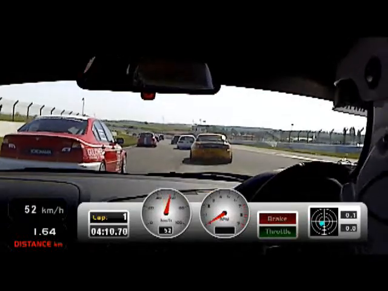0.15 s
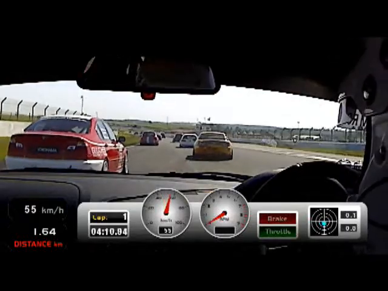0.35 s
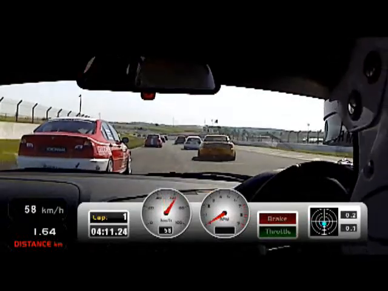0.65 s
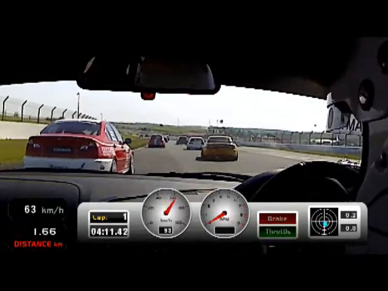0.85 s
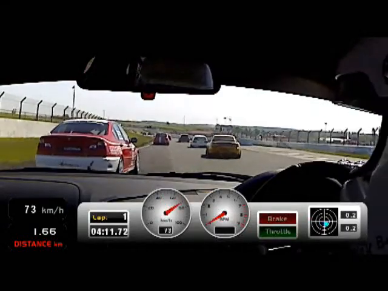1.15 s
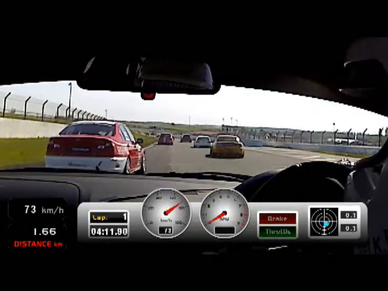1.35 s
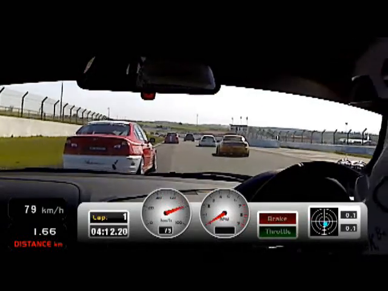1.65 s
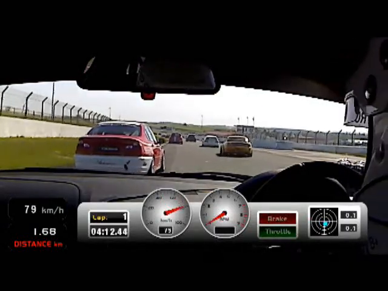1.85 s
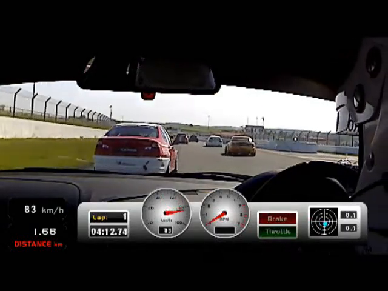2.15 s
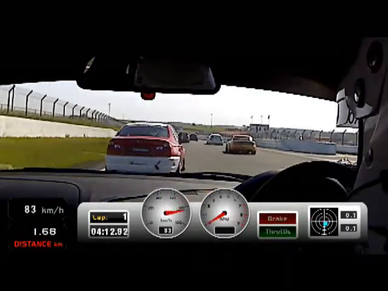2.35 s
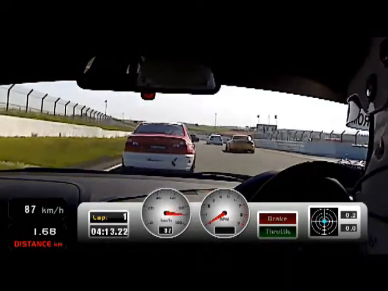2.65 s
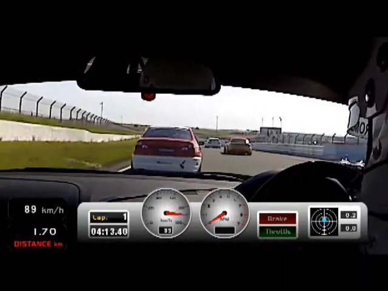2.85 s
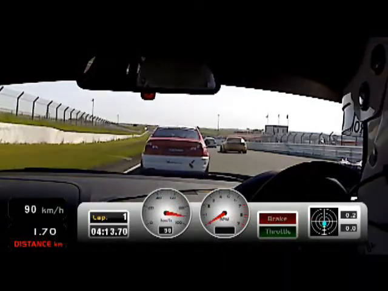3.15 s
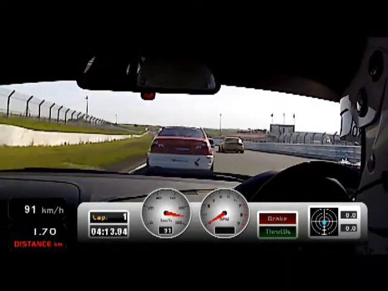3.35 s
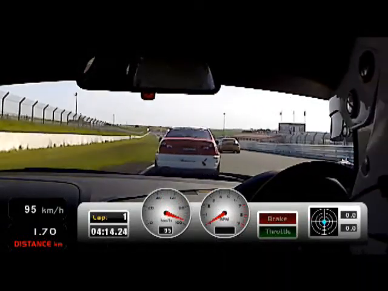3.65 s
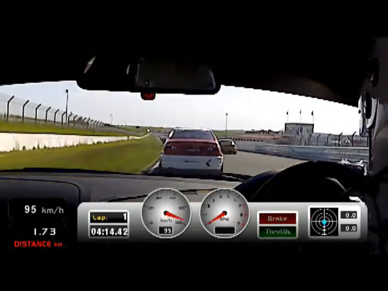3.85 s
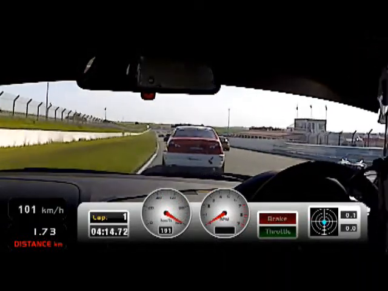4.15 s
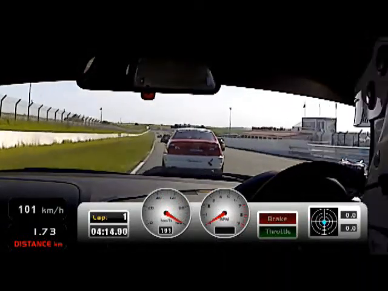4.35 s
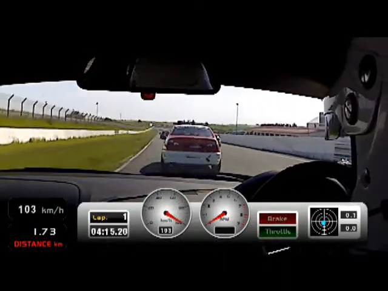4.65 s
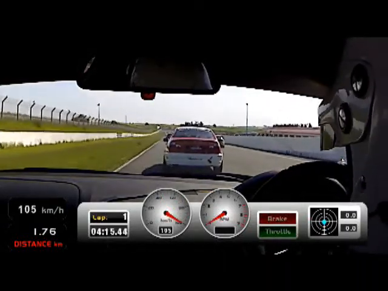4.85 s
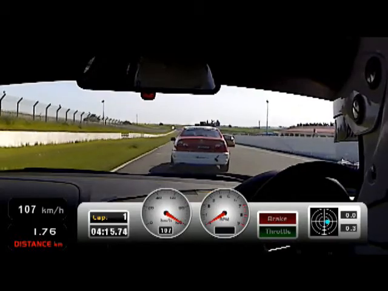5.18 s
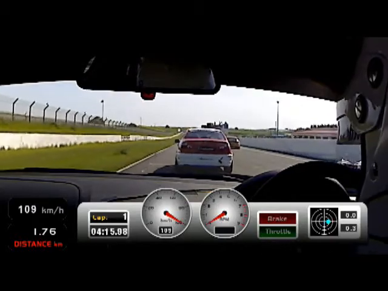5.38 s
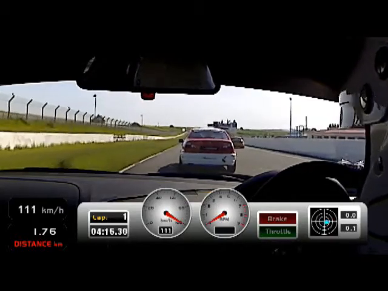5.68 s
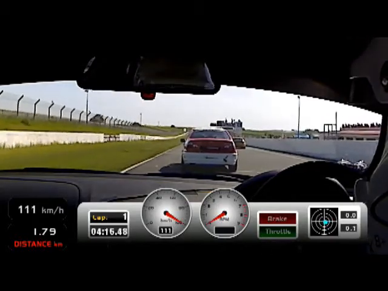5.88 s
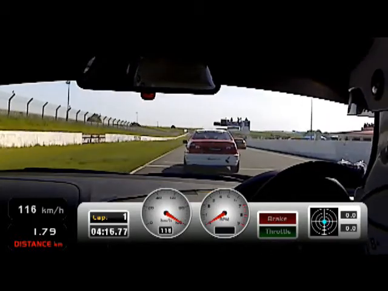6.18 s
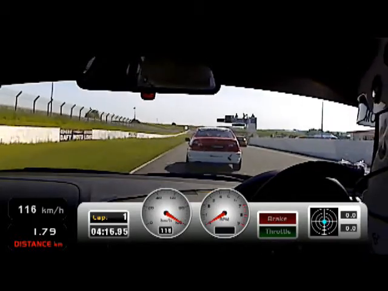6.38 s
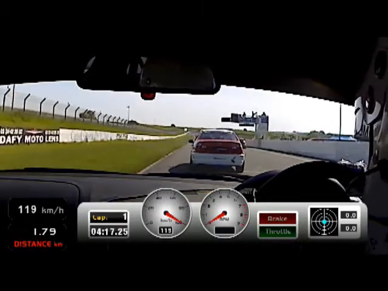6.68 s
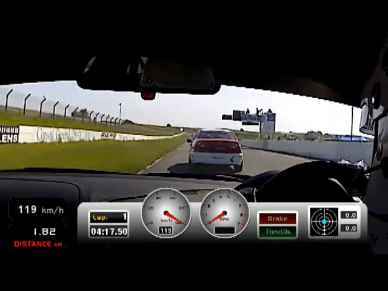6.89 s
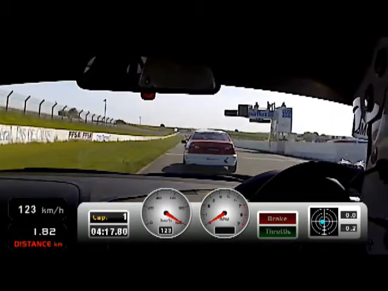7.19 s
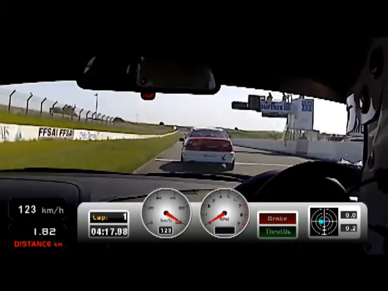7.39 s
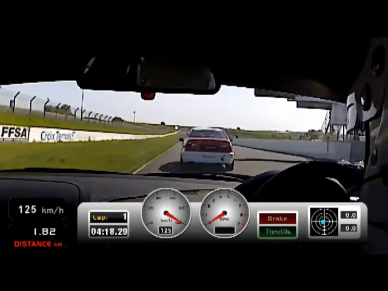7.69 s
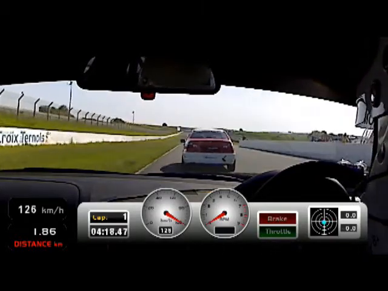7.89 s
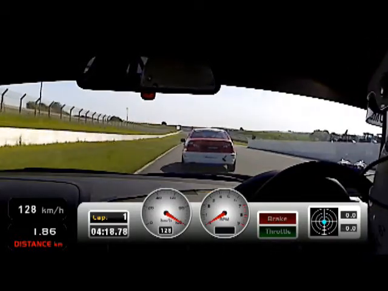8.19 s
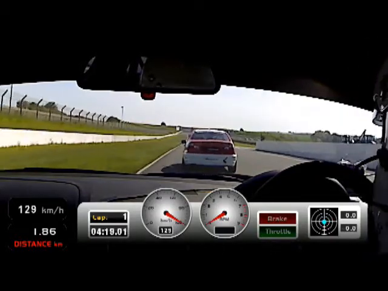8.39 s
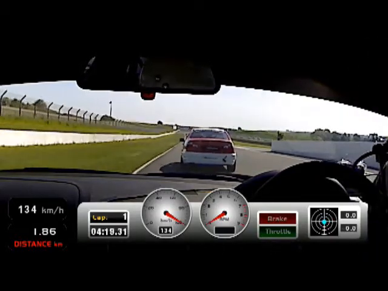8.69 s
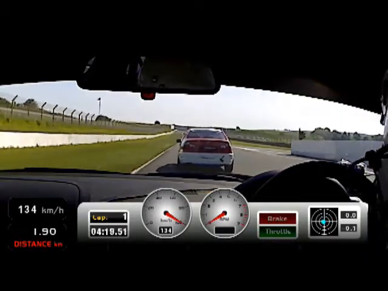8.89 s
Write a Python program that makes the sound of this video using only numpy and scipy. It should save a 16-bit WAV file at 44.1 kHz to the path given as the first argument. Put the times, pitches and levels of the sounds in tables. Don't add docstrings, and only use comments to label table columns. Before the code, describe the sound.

A small, dull microphone in a hollow metal cabin catches a loud engine accelerating on a track. A neighbouring car's note fades almost at once. The engine rises, lifts for one shift, lands lower with a floor boom and drones upward again. Light metallic ticking runs throughout, with clusters of hard knocks around the middle and again, much louder, towards the end, over growing wind and road noise.

```python
import sys
import numpy as np
from scipy import signal
from scipy.fft import rfft, irfft, next_fast_len
from scipy.io import wavfile
from scipy.ndimage import uniform_filter1d

SR = 44100
rng = np.random.default_rng(int(sys.argv[2]) if len(sys.argv) > 2 else 0)


def materialize(psi):
    bounded = np.clip(np.atleast_2d(psi).T, -1, 1)
    quanta = np.round(bounded * 32767).astype(np.int16)
    wavfile.write(sys.argv[1], SR, quanta)


def invert_db(x):
    u = np.asarray(x, float) / 20
    return 10 ** u


N = 398223

# time in seconds, four-stroke cycles per second.
ENGINE_SPEED = [(0, 37.5), (.5, 40.55), (1, 44.25), (1.5, 47.8), (2, 51), (2.45, 53.85), (2.6, 52),
                (2.9, 38.5), (2.97, 37.2), (4, 39.75), (5, 42.8), (6, 45.7), (7, 48.7), (8, 51.35),
                (9.03, 54.25)]
# time in seconds, level in dB.
THROTTLE = [(0, -4.5), (1, 2), (2.42, 2), (2.5, -22), (2.86, -4), (2.98, -1), (6, 0), (7.5, 1.5),
            (9.03, -2)]
ORDER_DB = [-0.5, 6.5, 6, 10, 17, 21, 15.5, 8.5, 11, 5.5, 14.5, 22, 7.5, 11.5, 16, 16, -2, 14.5, 1, 14, 11,
            -6, -1.5, 9, 2, 3, 3, 5, 7.5, 5.5]
MAIN_ORDERS = [5, 6, 7, 12, 14]
# low gear in dB, high gear in dB.
MAIN_ORDER_DB = [(-4.5, -1.5), (-0.5, 0), (-14.5, -12.5), (3, 0.5), (-9.5, -5.5)]
# centre in Hz, width in Hz, level in dB.
MOUNTS = [(227.8, 7, -23), (251.5, 4.5, -27), (272.6, 7.6, -29.5), (307.3, 7.1, -35), (320, 9.4, -39),
          (491, 11, -35), (532, 4.8, -34), (556, 7, -38.5), (602.6, 3, -36), (637.5, 7.3, -39),
          (693.4, 14, -36), (714, 5.7, -45.5)]
# frequency in Hz, level in dB per Hz.
SHELL_SLOPE = [(20, -49), (55, -59.5), (95, -43.5), (150, -59), (200, -49.5), (300, -60.5), (450, -60),
               (600, -64.5), (900, -65), (1300, -72.5), (2000, -74.5), (2500, -84), (4000, -95),
               (7400, -105)]
# centre in Hz, width in Hz, height in dB.
PANELS = [(238.2, 7.8, 16.5), (266.6, 12, 5.5), (319, 5.3, -6.5), (385.8, 11, 7), (442, 17, 4.5),
          (443, 4.7, -9.5), (494.3, 12, 8), (545, 24, 9.5), (626, 9.9, 6), (743, 22, 0), (755, 20, 2.5),
          (830.2, 29.3, 8), (1005, 64, -6.5), (1147, 3.3, 9), (1332, 30, -9.5), (1569, 24, 9),
          (1670, 18, 10.5), (1910, 6.8, 10.5), (2110, 63, 1.5), (2353, 14, 9), (2720, 34, 5),
          (2964, 150, 7), (3540, 190, 9), (4390, 170, 7.5), (7850, 86, 4)]
# time in seconds, road in dB, wind in dB.
LOADS = [(0, -5.5, -15), (1, -4, -1.5), (1.38, 0, -1), (1.53, -3, -2.5), (2.46, 0, 4.5), (3.24, -3.5, 3),
         (3.45, -3.5, -1), (4.17, 0, 7), (4.65, -1.5, 2.5), (5.15, -4, 1.5), (6.26, 0, 3), (6.71, 0, 7.5),
         (7.19, 0, 4), (7.57, 1, 6), (7.92, 1.5, 8), (8.1, 0.5, 5), (8.8, 2.5, 8), (9.03, 2, 10)]
# time in seconds, change in dB.
JOLTS = [
    (1.301, 4),
    (2.35, 4),
    (2.72, -3),
    (2.98, 3),
    (6.9, 2),
    (6.2, 1.5),
    (7.299, 4.5),
    (7.881, 7.5),
    (8.8, 2),
]
# low edge in Hz, high edge in Hz, level in dB,
# then the shares of road, wind and jolts from 0 to 1.
REGIONS = [(9.8, 75, 1, .01, 0.83, .01), (79, 190, -0.03, .01, 0.59, .01),
           (195.7, 300, 0.12, 0.49, .01, .99), (296, 1050, -0.25, 0.93, .01, 0.17),
           (1058, 2600, 0.26, 0.58, .01, 0.18), (2630, 8000, 0.07, 0.78, .01, .1)]
# start in seconds, length in
# seconds, level in dB, pitch in Hz.
FLOOR_SWELLS = [(.64, 0.18, -28, 101), (0.976, 0.17, -28, 98.5), (1.15, 0.12, -24.5, 96),
                (1.29, 0.28, -20.5, 95.3), (1.594, .25, -24, 97.9), (1.869, 0.64, -26, 83.2),
                (2.502, 0.48, -24.5, 98.9), (2.877, 0.16, -6.5, 93.08), (3.057, 0.095, -18, 97.48),
                (3.141, 0.096, -15.5, 95), (3.281, 0.45, -19.5, 94), (3.724, 0.46, -15, 96.3),
                (4.056, 0.42, -12.5, 95.6), (4.452, .16, -12, 99.8), (4.599, 0.29, -17, 97.3),
                (4.874, .17, -18, 96), (5.031, 0.1, -16.5, 98.2), (5.135, 0.86, -19, 99.8),
                (5.954, .14, -26.5, 96.7), (6.218, 0.17, -23, 104), (6.461, 0.26, -18, 96.8),
                (6.679, 0.18, -16, 91.5), (6.916, .2, -22, 93), (7.074, 0.12, -22, 94),
                (7.36, .15, -20.5, 100), (7.494, 0.38, -17, 99.1), (7.863, 0.13, -18, 93.4),
                (8.046, 0.17, -25.5, 97.6), (8.421, 0.23, -25, 95.6), (8.633, 0.63, -16.5, 103.5)]
# time in seconds, pitch in Hz, level in dB.
SHAFT = [(0, 56.3, -42), (.6, 61.9, -39), (1.4, 70.6, -30), (2.45, 80.8, -29), (3, 82, -40),
         (9.03, 119, -45)]
# time in seconds, pitch in Hz, level in dB.
RIVAL = [(0, 262.5, -40), (.4, 279.6, -32), (.46, 282.5, -35), (.56, 288, -65), (9.03, 297, -120)]
# time in seconds, peak in dB.
TICKS = [(0.049, -39.5), (0.378, -39.5), (0.426, -41.5), (0.475, -43), (0.926, -46), (1.483, -34),
         (2.214, -40), (2.951, -40.5), (3.023, -44.5), (3.948, -39), (3.997, -36.5), (4.198, -39),
         (4.238, -39.5), (4.275, -37), (4.294, -38.5), (4.591, -39), (4.836, -52), (5.261, -43.5),
         (5.689, -41.5), (6.639, -39.5), (7.073, -40), (7.345, -46), (7.475, -47.5), (7.605, -42.5),
         (7.658, -36.5), (7.758, -43.5), (8.323, -41), (8.518, -39), (8.847, -45), (8.945, -40.5)]
# frequency in Hz, level in dB, 60 dB decay time in seconds.
FITTING_MODES = [(4649, -0.5, 0.041), (4700, -1.5, 0.018), (5600, -10.5, 0.0059), (5964, -6, 0.008),
                 (2950, -6.5, 0.075), (3575, -6, 0.033)]
# time in seconds, peak in dB, loudest pitch in Hz, brightness in dB per octave.
CLACKS = [(0.3606, -42.5, 1970, 1), (0.9189, -35.5, 1670, 5.5), (1.123, -31.5, 1614, 1.5),
          (1.4584, -26, 1570, 5), (2.9087, -34.5, 1644, 5), (2.977, -32, 1980, 4), (3.9515, -25, 2130, -3),
          (4.2712, -15, 2790, 2), (4.342, -29, 1560, -3), (4.386, -35, 1634, 3.5),
          (4.5605, -27.5, 1670, -2), (4.6416, -24.5, 1670, -6), (4.7668, -18.5, 1860, -7.5),
          (4.785, -10, 3880, 0.5), (4.8016, -16, 2430, -6), (5.1318, -29.5, 3600, -0.5),
          (5.264, -26, 1586, -3), (5.8358, -30, 1670, 7), (6.33, -33, 1750, 0.5), (7.2215, -18, 1645, -9),
          (7.239, -5, 1635, -7.5), (7.2523, -5, 2996, 0), (7.3464, -25.5, 2030, 10),
          (7.3996, -10.5, 1850, -4), (7.4134, -32, 1670, 7), (7.7835, -25.5, 1704, -4),
          (7.8386, -3, 3420, 1.5), (7.8574, -17.5, 2800, 3.5), (8.835, -34, 1587, 6),
          (8.985, -18, 2855, 4.5)]
# frequency in Hz, width in Hz, level in dB.
BODY_MODES = [(603, 220, -1.5), (980, 340, -1), (1130, 94, -5.5), (1670, 68, 6.5), (1980, 67, 0),
              (2180, 59, 4), (2787, 180, 4), (3246, 140, 6.5), (3600, 87, 2.5), (3980, 450, 2.5),
              (4690, 340, 3), (6170, 300, -10.5), (6500, 650, -23.5), (7300, 310, -13)]
# time in seconds, pitch in Hz, level in dB.
GEAR_WHINE = [(2.05, 420, -64.5), (2.2, 432, -33), (2.75, 437, -34), (2.9, 425, -56)]

SHIFT_S = 2.7
JOLT_S = 0.13
SWELL_POINT, SWELL_LEAN = 0.82, 0.88
PANEL_REST_DB = -28
LIGHT_TICKS_PER_S, LIGHT_TICK_DB = 14, -50
CONTACT_S = 0.007
CLACK_T60_S = 0.14
BANDWIDTH_HZ, CLIP_LEVEL = 7740, 0.52


def in_time(rows):
    s, *columns = np.transpose(rows)
    return [np.interp(np.arange(N) / SR, s, c) for c in columns]


def rms_one(x):
    return x / np.sqrt(np.mean(x ** 2) + 1e-20)


def drift(rate_hz):
    r = np.exp(-80 * np.pi * rate_hz / SR)
    noise = rng.standard_normal(N // 40 + 2002)
    slow = signal.lfilter([1], [1, -2 * r, r * r], noise)[2000:]
    return np.interp(np.arange(N) / 40, np.arange(len(slow)), rms_one(slow - slow.mean()))


def tone(hz, db, step=1):
    turns = step * np.cumsum(hz) / SR + rng.random()
    return np.sqrt(2) * invert_db(db) * np.sin(2 * np.pi * turns)


def resonance(x, hz, width_hz):
    r = np.exp(-np.pi * width_hz / SR)
    top = np.array([1, 0, -1]) * (1 - r * r) / 2
    return signal.lfilter(top, [1, -2 * r * np.cos(2 * np.pi * hz / SR), r * r], x)


def shell_db(hz):
    corner_hz, corner_db = np.transpose(SHELL_SLOPE)
    slope = np.interp(np.log(hz + 1), np.log(corner_hz), corner_db)
    return slope + sum(db * np.exp(-.5 * ((hz - centre) / width) ** 2) for centre, width, db in PANELS)


def mount_db(hz):
    power = sum(invert_db(db) ** 2 / (1 + ((hz - centre) / width) ** 4) for centre, width, db in MOUNTS)
    return 10 * np.log10(power)


def engine():
    step = 8
    cycle_hz, throttle_db = in_time(ENGINE_SPEED)[0][::step], in_time(THROTTLE)[0][::step]
    low_gear = np.arange(0, N, step) < SHIFT_S * SR
    main_db = dict(zip(MAIN_ORDERS, MAIN_ORDER_DB))
    order_db = ORDER_DB + [db - 7.5 for db in ORDER_DB[-6:]] * 2
    out = 0
    for k, db in enumerate(order_db, start=1):
        waver = drift(1.9)[::step]
        if k in main_db:
            gear_db = np.where(low_gear, *main_db[k])
            level_db = gear_db + mount_db(k * cycle_hz) + np.minimum(throttle_db, 0) + 0.62 * waver
        else:
            level_db = db + throttle_db + shell_db(k * cycle_hz) - 1.0 + 2.5 * waver
        out = out + tone(k * cycle_hz, level_db, step)
    return signal.resample_poly(out, step, 1)[:N]


def road():
    road_db, wind_db = in_time(LOADS)
    t = np.arange(N) / SR
    jolt_db = sum(db * np.exp(-.5 * ((t - s) / JOLT_S) ** 2) for s, db in JOLTS)
    size = next_fast_len(N)
    hz = np.fft.rfftfreq(size, 1 / SR)
    coloured = rfft(rng.standard_normal(size)) * invert_db(shell_db(hz)) * np.sqrt(SR / 2)
    out, together = np.zeros(N), drift(3.9)
    for low, high, db, of_road, of_wind, of_jolts in REGIONS:
        load_db = db + of_road * road_db + of_wind * wind_db + of_jolts * jolt_db
        edges = np.geomspace(low, high, 3)
        for a, b in zip(edges, edges[1:]):
            patch = irfft(coloured * ((hz >= a) & (hz < b)), size)[:N]
            out += patch * invert_db(load_db + .6 * together + 1.2 * drift(4.4))
    return out


def floor_boom():
    t = np.arange(N) / SR
    start, _, _, hz = np.transpose(FLOOR_SWELLS)
    swells = np.zeros(N)
    for s, length, db, _ in FLOOR_SWELLS:
        progress = np.clip((t - s) / length, 0, 1)
        swells += invert_db(db) * np.sin(np.pi * progress ** SWELL_LEAN) ** SWELL_POINT
    resting = invert_db(PANEL_REST_DB + 2.9 * drift(6.2)) * np.clip((start[0] - t) * 20, 0, 1)
    latest = np.maximum(np.searchsorted(start, t) - 1, 0)
    pitch_hz = uniform_filter1d(hz[latest], size=900)
    return (swells + resting) * tone(pitch_hz + 2.5 * drift(9.1), 0.27 * drift(1.6))


def propeller_shaft():
    return tone(*in_time(SHAFT))


def rival():
    hz, db = in_time(RIVAL)
    return tone(hz, db + 3) + tone(2 * hz, np.minimum(db + 1.0, -34) + 1)


def fitting():
    at_s, tick_db = np.transpose(TICKS)
    at = (at_s * SR).astype(int)
    strengths_db = rng.normal(0, 1.5, (len(at), len(FITTING_MODES)))
    chatter = (rng.random(N) < 70 / SR) * invert_db(-60 + 3.5 * rng.standard_normal(N))
    light_rate = LIGHT_TICKS_PER_S * .7 * invert_db(7 * drift(4))
    chatter += (rng.random(N) < light_rate / SR) * invert_db(LIGHT_TICK_DB + 2.7 * rng.standard_normal(N))
    touch = np.hanning(int(CONTACT_S * SR))
    touch_t = np.arange(len(touch)) / SR
    out = np.zeros(N)
    for k, (hz, mode_db, t60) in enumerate(FITTING_MODES):
        clicks = chatter.copy()
        clicks[at] = invert_db(tick_db + strengths_db[:, k])
        scrape = 2 * touch / touch.sum() * np.cos(2 * np.pi * hz * touch_t)
        push = signal.fftconvolve(clicks, scrape)[:N]
        r, w = invert_db(-60 / (t60 * SR)), 2 * np.pi * hz / SR
        ringing = signal.lfilter([0, np.sin(w)], [1, -2 * r * np.cos(w), r * r], push + 1e-18)
        out += invert_db(mode_db + 3.5) * resonance(ringing, hz, 11 / t60)
    return out


def clacks():
    out, t = np.zeros(N + SR), np.arange(int(.4 * SR)) / SR
    attack = 1 - np.exp(-t / 0.00039)
    decay = invert_db(-60 * np.maximum(t - .004, 0) / CLACK_T60_S)
    cabin_tail = invert_db(-20.0 - 60 * t / 0.22)
    for s, db, hz, bright_db in CLACKS:
        bounces_db = np.repeat(rng.standard_normal(len(t) // 100 + 1), 100)[:len(t)]
        rattle = rng.standard_normal(len(t)) * attack * (decay + cabin_tail) * invert_db(3.0 * bounces_db)
        ring = invert_db(7) * resonance(rattle, hz, 160) / np.sqrt(160)
        for k, (mode_hz, width, mode_db) in enumerate(BODY_MODES):
            width = max(width, 110)
            gain = (-1) ** k * invert_db(mode_db + bright_db * np.log2(mode_hz / 3000))
            ring += gain * resonance(rattle, mode_hz, width) / np.sqrt(width)
        at = int(s * SR)
        out[at:at + len(t)] += invert_db(db - 12.5) * ring / np.std(ring[:int(.02 * SR)])
    return out[:N]


def gear_whine():
    return tone(*in_time(GEAR_WHINE))


def scene():
    car = engine() + road() + floor_boom() + propeller_shaft() + gear_whine()
    return (car + rival() + fitting() + clacks())[None]


def top_cut(x):
    return signal.sosfilt(signal.butter(12, 15300, fs=SR, output="sos"), x)


def record(dry):
    band = signal.ellip(12, .3, 80, BANDWIDTH_HZ, fs=SR, output="sos")
    narrow = signal.sosfilt(band, dry)
    clipped = narrow / (1 + np.abs(narrow / CLIP_LEVEL) ** 60) ** (1 / 60)
    return top_cut(clipped)


dry = scene()
out = record(dry)
materialize(out)
```